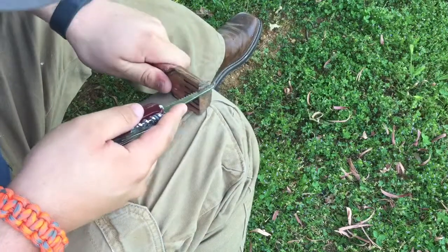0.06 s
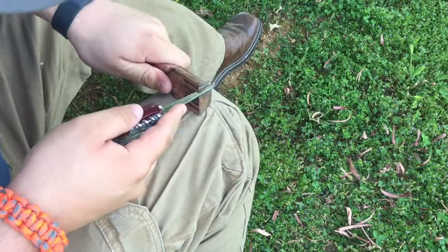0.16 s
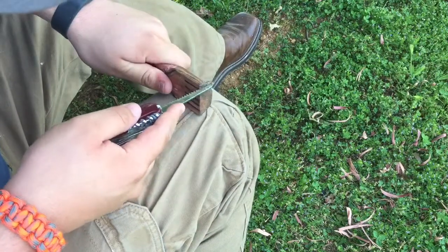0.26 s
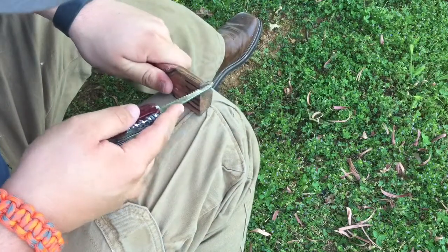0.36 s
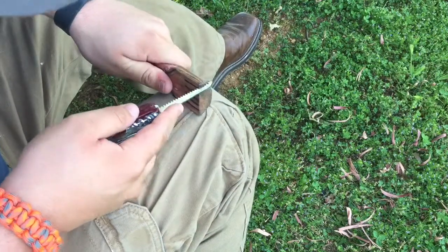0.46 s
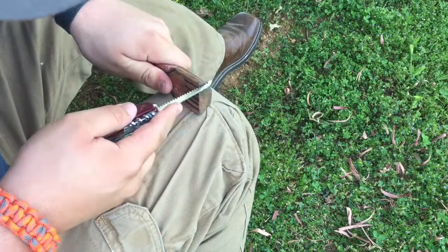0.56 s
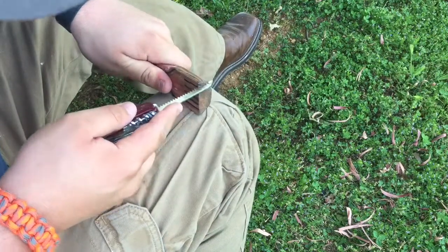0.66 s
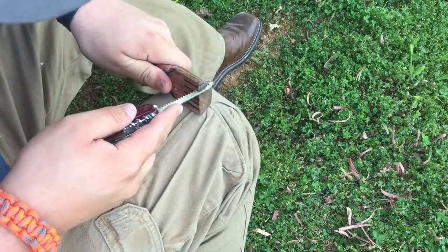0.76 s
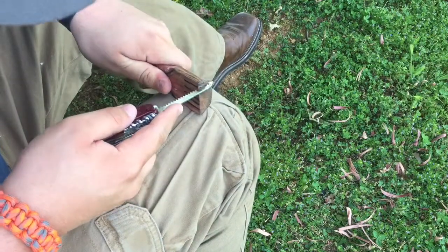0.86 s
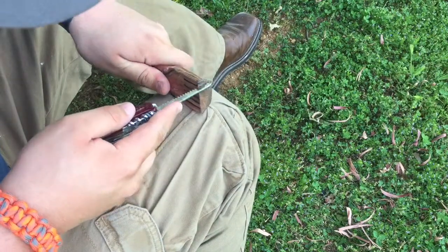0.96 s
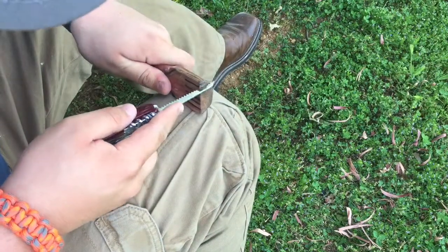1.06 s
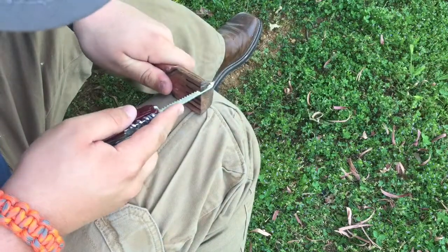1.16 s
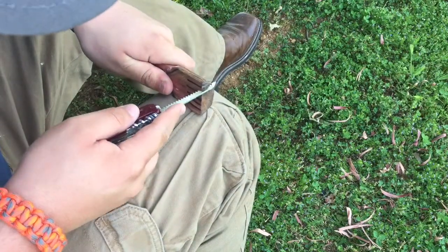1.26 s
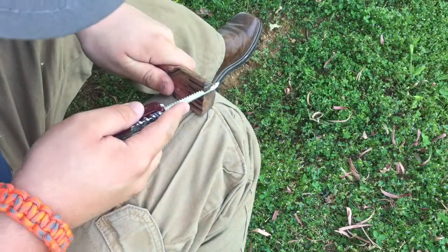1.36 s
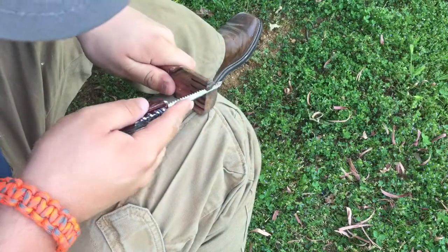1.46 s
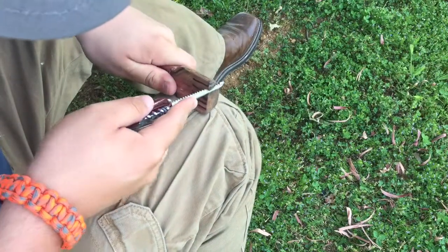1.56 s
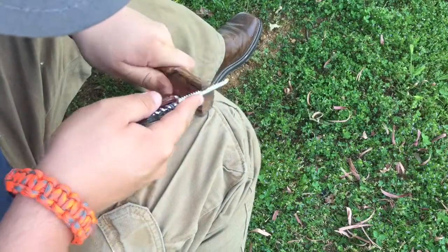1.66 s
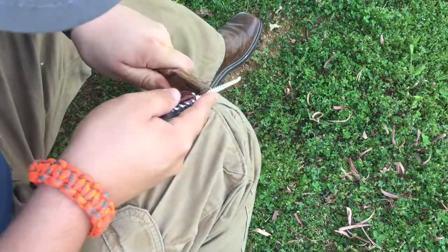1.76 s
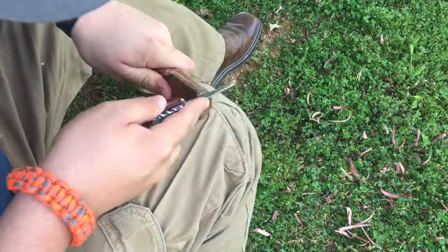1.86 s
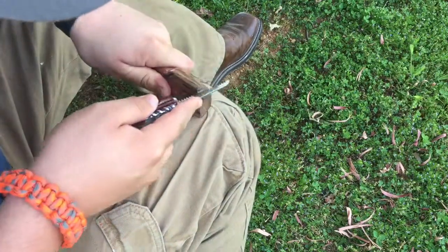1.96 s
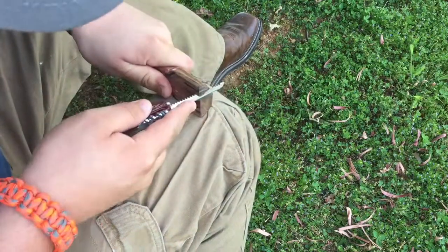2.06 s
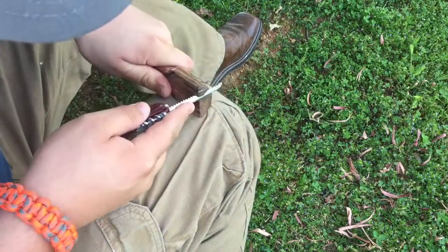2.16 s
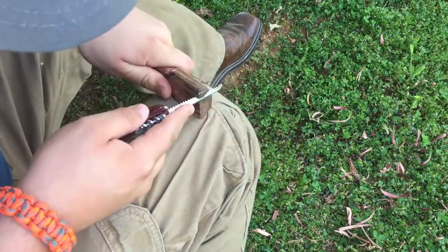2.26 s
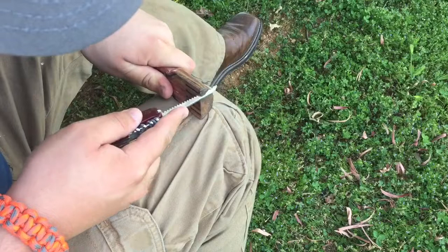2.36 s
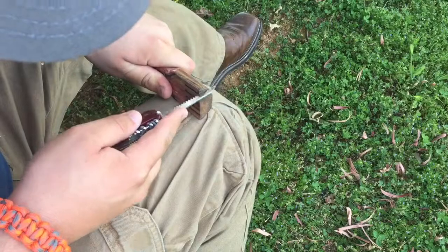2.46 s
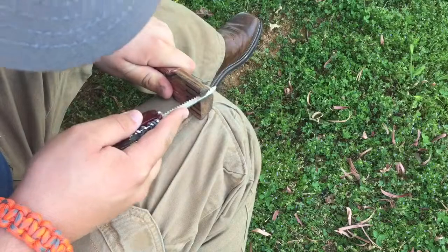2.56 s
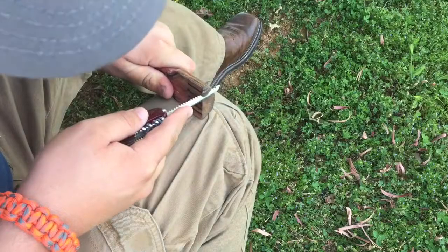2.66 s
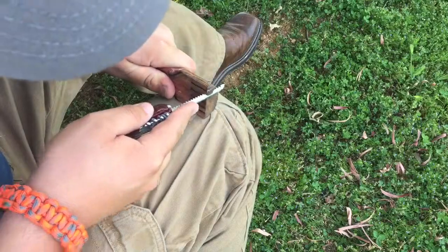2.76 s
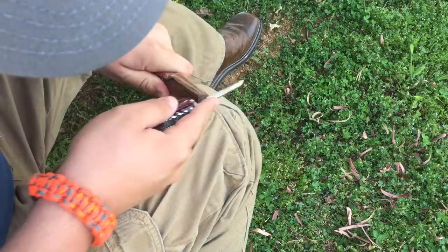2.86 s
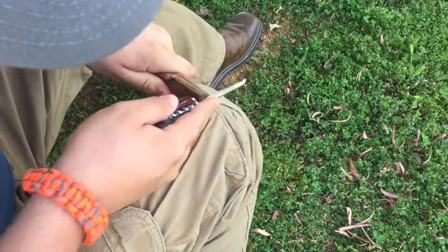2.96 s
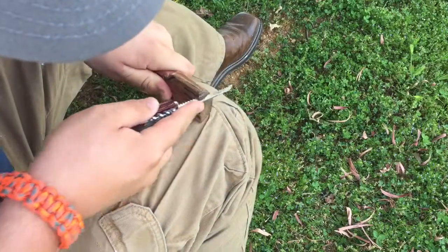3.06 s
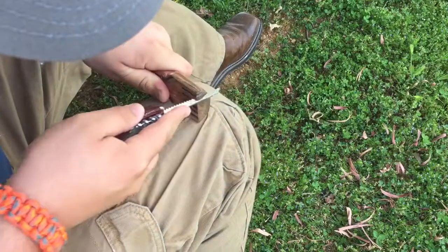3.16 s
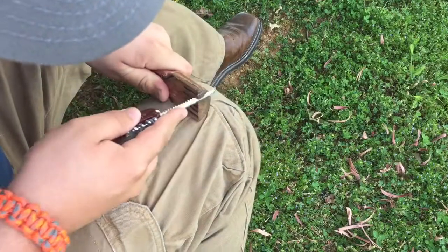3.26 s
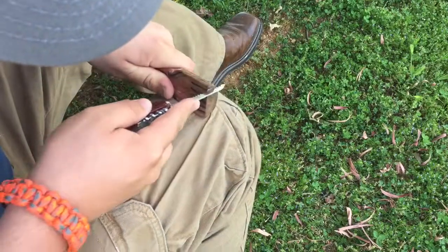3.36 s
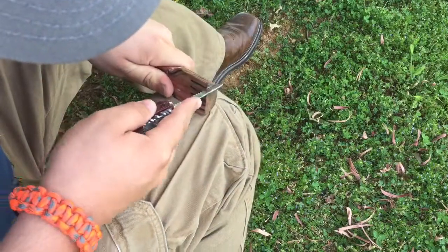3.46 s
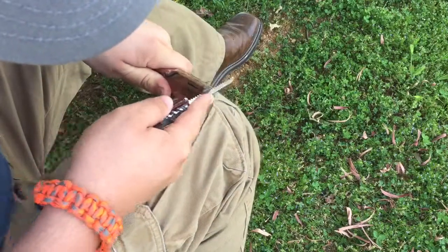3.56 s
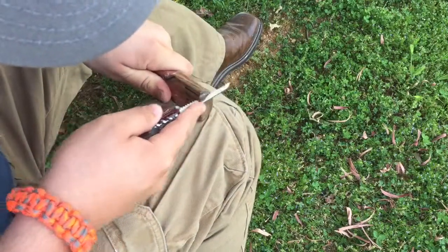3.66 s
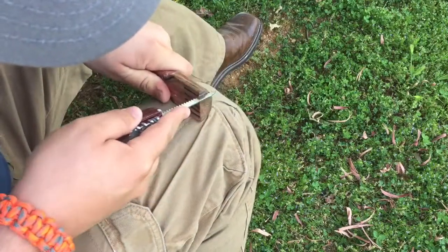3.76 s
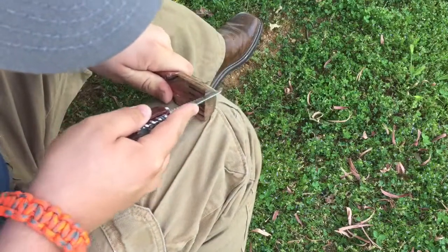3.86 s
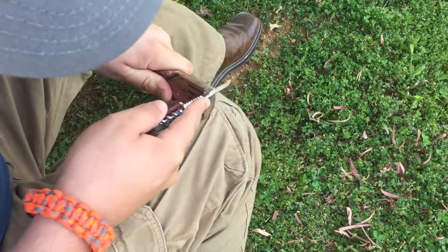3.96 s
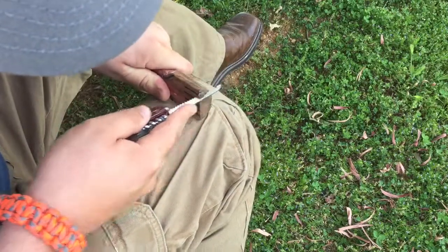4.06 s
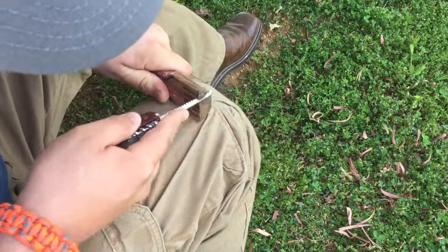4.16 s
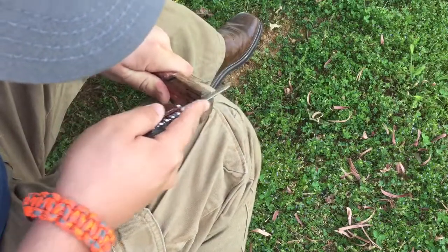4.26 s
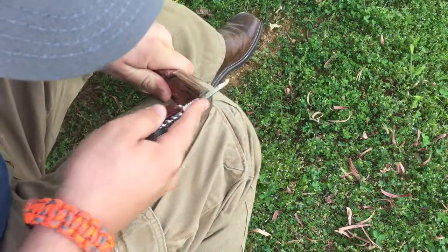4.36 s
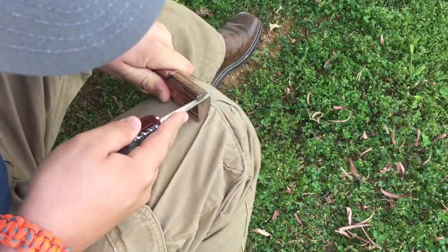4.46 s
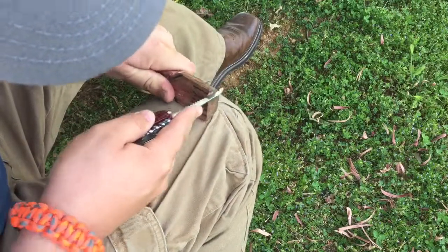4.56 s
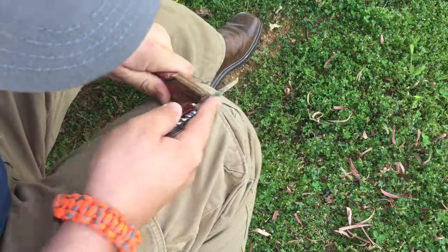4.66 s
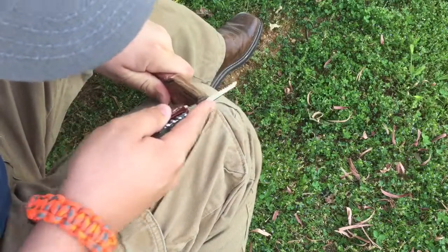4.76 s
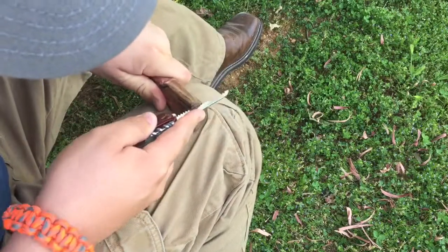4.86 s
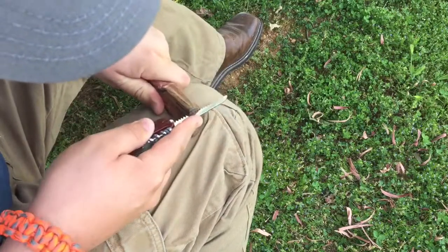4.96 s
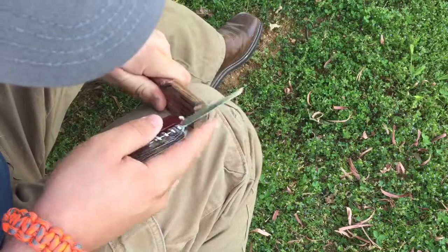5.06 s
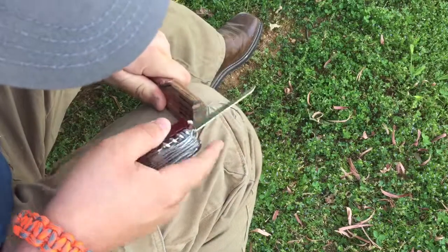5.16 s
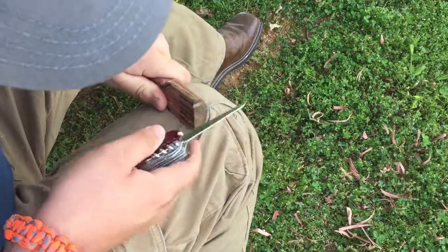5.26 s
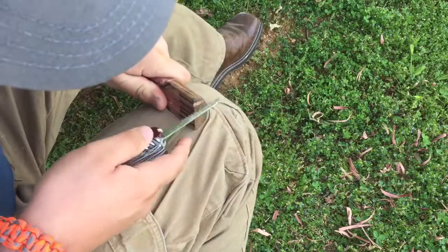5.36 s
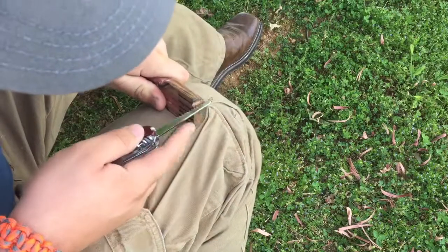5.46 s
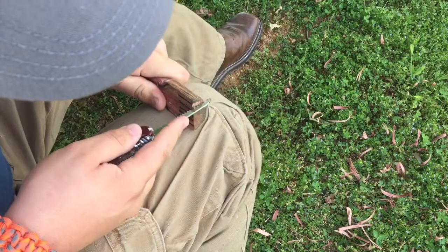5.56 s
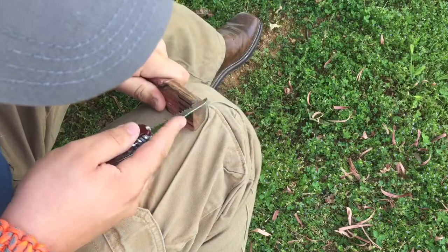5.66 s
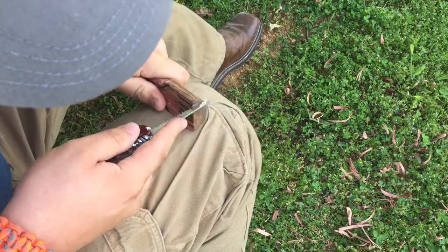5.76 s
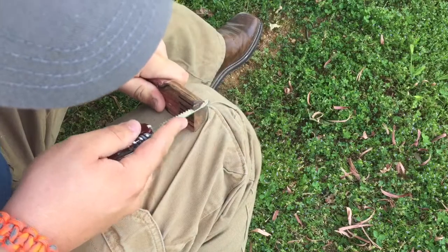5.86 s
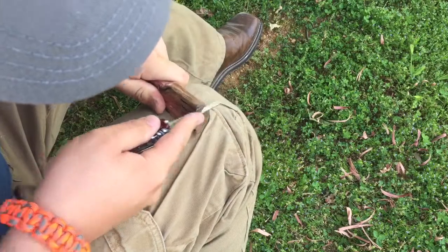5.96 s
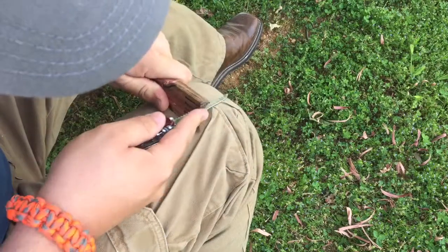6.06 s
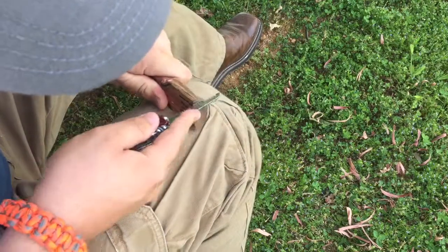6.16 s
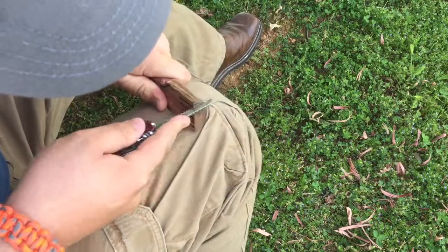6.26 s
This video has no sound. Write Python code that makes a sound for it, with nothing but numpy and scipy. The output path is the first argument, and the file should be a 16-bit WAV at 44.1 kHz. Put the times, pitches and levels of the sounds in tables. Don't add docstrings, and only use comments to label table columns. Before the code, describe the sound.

Small saw teeth grip and slip in a hand-held wood block, giving brief, crackling, knocky scrapes rather than a smooth sawing rhythm. Light taps on the wood come before and between the strokes. The sound is near and dry with only a slight outdoor echo. Behind are soft traffic, a faint hum, even airy hiss, a distant engine rising briefly early on, and faint birds. Sawing pauses near five seconds, then resumes weakly.

```python
import sys
import numpy as np
from scipy import signal
from scipy.fft import rfft, irfft
from scipy.io import wavfile
from scipy.ndimage import uniform_filter1d

SR = 44100
rng = np.random.default_rng(int(sys.argv[2]) if len(sys.argv) > 2 else 0)


def store_pcm(level_fs):
    pcm = np.round(np.clip(level_fs, -1, 1) * 32767).astype(np.int16)
    wavfile.write(sys.argv[1], SR, np.atleast_2d(pcm).T)


def ratio_of_db(decibels):
    return 10 ** (np.asarray(decibels, float) / 20)


N = 278712

# [t/s, level/dB]
TRAFFIC_SWELL = [(0.0, -69), (0.03, -52.5), (0.42, -58), (0.46, -55), (2.46, -52), (2.52, -49.5),
                 (2.67, -53.5), (5.09, -54.5), (5.76, -69.5), (6.16, -45), (6.27, -67), (6.32, -39.5)]
# [f/Hz, level/dB]
RUMBLE_COLOUR = [(12, -25.5), (20, -20.5), (54, -1.5), (108, -2), (134, -1.5), (166, -6.5), (211, -11.5),
                 (248, -13.5), (325, -28), (500, -28.5), (650, -66.5), (1100, -120)]
# [f/Hz, level/dB]
AIR_COLOUR = [(180, -38), (300, 3.5), (326, -6.5), (367, -1.5), (567, -8), (754, -5), (1150, -7),
              (1230, -6), (1530, -7), (2980, -10), (6780, -15.5), (15200, -22), (16500, -41)]

# [peak t/s, level/dB, fall/ms, depth/dB]
CATCHES = [(1.7174, -18, 9, -7.5), (1.7301, -24.5, 6.2, -1.5), (1.774, -32, 14, 0), (1.7946, -39.5, 6.5, 4),
           (1.8825, -41.5, 7, 0.5), (1.9283, -46, 5.7, 0), (1.9483, -38.5, 6, 4.5), (2.059, -46.5, 14, 1),
           (2.8624, -21.5, 6.7, -0.5), (2.9004, -27, 6.5, -4), (3.078, -31, 8, 1), (3.103, -32, 6, 5),
           (3.235, -41.5, 9, 2.5), (3.5525, -21.5, 11.7, -8.5), (3.7296, -31.5, 11.5, -5.5),
           (3.7596, -29.5, 8, -4), (3.7778, -33, 4.8, -5), (3.9296, -42.5, 5, -2), (3.96, -32, 6.6, -3.5),
           (4.0288, -37, 4.7, 3), (4.1238, -27.5, 6, -0.5), (4.1343, -33, 9, -1.5),
           (4.2944, -19, 13.5, -4.5), (4.4618, -32.5, 5, 0.5), (4.614, -41, 3.9, -6),
           (4.6593, -16, 11.5, -5), (4.7043, -20.5, 7.6, -2), (5.973, -29, 4.5, -12),
           (5.9814, -30, 3.9, -8.5), (5.999, -32, 4, -5.5)]
# [peak t/s, level/dB, depth/dB]
SHORT_SLIPS = [(1.745, -28, -2), (1.768, -28, -0.5), (1.8917, -40, 2), (1.9416, -33.5, 3), (2.0005, -37, 2.5),
               (2.0214, -41.5, 3), (2.8765, -28, 5.5), (2.8934, -26.5, -5), (2.9094, -22, -3), (3.065, -34.5, 0),
               (3.098, -28.5, -4), (3.1129, -28.5, 2.5), (3.1279, -32, 2), (3.1828, -30.5, -1.5),
               (3.2157, -38.5, 5), (3.5908, -36, 7.5), (3.944, -29.5, -0.5), (3.953, -32, -3), (3.968, -29, -6.5),
               (4.1556, -33, 1.5), (4.1715, -33, -3.5), (4.1905, -44.5, -5), (4.2693, -31, -3.5),
               (4.3122, -26.5, -2.5), (4.3312, -25, -1), (4.3361, -24.5, -4), (4.6804, -24, -5.5),
               (4.7153, -27.5, 2.5), (4.7312, -32.5, 8), (4.837, -27, -2.5),
               (0.0588, -60, -1), (2.4185, -53.5, -4), (2.6792, -57, 2), (4.593, -52, -4), (5.0603, -57, 1.5),
           (5.7763, -63, 6), (5.9436, -45, 0.5), (5.9554, -51, -15), (6.1185, -60, -18),
           (6.2414, -49.5, -2), (6.251, -44.5, 4), (6.2697, -40, 3), (6.2832, -41, 0), (6.2935, -41.5, 7),
           (6.3014, -43, 8), (6.3186, -37.5, 3)]
# [start t/s, length/s, level/dB, depth/dB]
CHATTER = [(0.305, .025, -59.5, -3), (1.692, .019, -57.5, -14), (1.759, .006, -29.5, 4),
           (1.967, .022, -59, 3), (2.081, .035, -62, 2.5), (2.194, .017, -63.5, -4),
           (2.353, .078, -58, -0.5), (2.884, .003, -41, -19), (2.915, .024, -33.5, 4.5),
           (3.138, .004, -44.5, 1), (3.191, .021, -38.5, -2), (3.228, .003, -43.5, 0),
           (3.249, .011, -44.5, -1), (3.261, .021, -56, 1), (3.567, .017, -36, 1), (3.747, .006, -34, 2),
           (3.789, .016, -43.5, 3), (4.146, .004, -40, -2), (4.471, .038, -33, -4), (4.752, .008, -66, 9),
           (4.832, .015, -38, -2.5), (6.008, .011, -35, -8), (6.094, .017, -62, -3), (4.454, .003, -41, -3),
           (1.875, .003, -51, 10), (4.116, .002, -45, -11)]
# [t/s, level/dB]
RAKE = [(.3, -1.5), (1.72, -1), (1.94, 3), (2.03, -4.5), (2.4, -3.5), (2.87, -2.5), (2.93, 3), (3.1, -3.5),
        (3.56, -1.5), (3.76, 0), (4.05, -0.4), (4.3, -5.5), (4.48, 1), (4.62, 6.5), (4.68, -1.9),
        (5.98, -3.5), (6.01, 4.5), (6.28, 0)]
# [f/Hz, width/Hz, level/dB]
BLOCK_RINGS = [(230, 210, 0), (370, 220, -7), (541, 61, -7), (671, 130, -3.5), (822.5, 145, 4),
               (902, 130, -30.5)]
# [f/Hz, width/Hz, level/dB]
BLOCK_AND_BLADE_RINGS = [(1434, 71, 8), (1533, 267, 10.5), (2007, 234, 13), (2360, 67, 7),
                         (2700, 130, -11.5), (3240, 580, -11.5), (3660, 840, -13.5)]
# [f/Hz, width/Hz, level/dB]
BLADE_RINGS = [(4830, 130, -18), (5950, 600, -5.5), (6110, 2800, 9.5), (7000, 750, -12), (9340, 1600, -20),
               (11810, 1800, -6), (13600, 1500, -16.5)]

# [t/s, thud level/dB, ring level/dB]
TAPS = [
    (.099, -56, -65),
    (0.901, -55, -54),
    (1.3814, -39, -37),
    (2.709, -46, -52),
    (2.7916, -43, -41.5),
]

# [t/s, f/Hz, level/dB, half length/s]
LOW_BIRD = [
    [(.57, 2325, -73, .04), (.66, 2335, -73, .06), (.745, 2415, -66, .022), (.782, 2418, -57, .02),
     (.85, 2400, -68, .045)],
    [(3.38, 2360, -77, .03), (3.45, 2365, -58, .027), (3.535, 2375, -66, .025), (3.62, 2360, -75, .06)],
]
# [t/s, f/Hz, level/dB, half length/s]
HIGH_BIRD = [
    [(.818, 4905, -67, .015), (.85, 4995, -69, .03), (.89, 5050, -61, .03), (.92, 5055, -65, .025),
     (.97, 5055, -77, .035)],
    [(3.51, 4760, -75, .02), (3.55, 4850, -69, .03), (3.61, 4950, -71, .025), (3.67, 4945, -80, .05)],
]
# [t/s, f/Hz, level/dB, half length/s]
FAR_BIRD = [
    [(.16, 3340, -71, .04), (.22, 3340, -77, .06)],
    [(.19, 4560, -83, .06), (.26, 4575, -81, .06)],
]
# [t/s, length/s, first f/Hz, last f/Hz, level/dB]
CHIRPS = [
    (2.228, .03, 2020, 1800, -77),
    (2.603, .031, 2080, 1750, -76),
    (2.958, .03, 2150, 1800, -70),
    (3.31, .027, 2000, 1700, -74),
    (3.46, .031, 1600, 1890, -76),
    (3.645, .03, 1690, 2100, -74),
    (3.824, .03, 1750, 2150, -73),
    (3.997, .027, 1640, 1880, -72),
]

# [middle t/s, length/s, level/dB]
RUSTLE = [
    (4.891, 0.17, -69),
    (5.029, 0.097, -75),
]
# [t/s, level/dB]
THREADS = [
    (4.885, -68),
    (4.973, -56.5),
]


def level(x, db):
    return x * ratio_of_db(db) / np.sqrt(np.mean(x ** 2))


def curve(s, values):
    return np.interp(np.arange(N) / SR, s, values)


def coloured(spectrum):
    hz, db = np.transpose(spectrum)
    f = np.maximum(np.arange(N // 2 + 1) * SR / N, 1)
    shape_db = np.interp(np.log(f), np.log(hz), db, -90, -90)
    white = rfft(rng.standard_normal(N))
    return level(irfft(white * ratio_of_db(shape_db), N), 0)


def walk(rate):
    k = int(SR / rate)
    steps = rng.standard_normal(N)[np.arange(N) // k]
    return 1.426 * uniform_filter1d(uniform_filter1d(steps, k), k)


def peak(x, hz, width):
    return signal.lfilter(*signal.iirpeak(hz, hz / width, SR), x)


def ring(x, modes, wander_db=0.):
    return sum(peak(x * ratio_of_db(db + wander_db * walk(40)), hz, width) for hz, width, db in modes)


def tone(rows, wobble, flutter_db, rate):
    s, hz, db = np.transpose(rows)
    span = np.interp(np.arange(N) / SR, s[[0, -1]], [1, 1], 0, 0)
    gate = uniform_filter1d(span, size=600)
    pitch = curve(s, hz) * (1 + wobble * walk(rate))
    phase = 2 * np.pi * np.cumsum(pitch) / SR
    return np.sqrt(2) * gate * ratio_of_db(curve(s, db) + flutter_db * walk(rate)) * np.sin(phase)


def traffic():
    s, low_db = np.transpose(TRAFFIC_SWELL)
    lull = (s > 4.95) & (s < 5.95)
    upper_db = -61 + .2 * (low_db - low_db.mean()) - 2 * lull
    rumble = coloured(RUMBLE_COLOUR)
    low = signal.sosfiltfilt(signal.butter(3, 90, fs=SR, output="sos"), rumble)
    low_band = level(low, 0) * ratio_of_db(curve(s, low_db) + 1.5 * walk(9))
    upper_band = level(rumble - low, 1.7) * ratio_of_db(curve(s, upper_db) + 3.0 * walk(10))
    return low_band + upper_band


def hum():
    hz, db = 241, -74
    return tone([(0, hz, db), (7, hz, db)], wobble=0.012, flutter_db=2.5, rate=6.5)


def air():
    return coloured(AIR_COLOUR) * ratio_of_db(-68.5 + .4 * walk(1.5))


def slips():
    rows = [(s, 2.1, fall, db, depth) for s, db, fall, depth in CATCHES]
    rows += [(s, 2.1, 2.6, db, depth) for s, db, depth in SHORT_SLIPS]
    tooth_gap_ms, tooth_rise_ms, tooth_fall_ms, scatter_db = 7, 2.4, 4.8, 2.5
    chances = rng.standard_normal((len(CHATTER), 3, 16))
    for (s, length, db, depth), (gap, size, tilt) in zip(CHATTER, chances):
        at = np.cumsum(tooth_gap_ms * 2 ** (gap / 3)) / 1000
        at -= at[0]
        for after, z, y in zip(at, size, tilt):
            if after <= length:
                rows.append((s + after, tooth_rise_ms, tooth_fall_ms,
                             db + scatter_db * z, depth + scatter_db * y))
    s, rise, fall, db, depth = np.transpose(rows)
    bright = db - 10 - 0.02 * (db + 26) + 0.13 * depth
    bright = bright + np.interp(s, *np.transpose(RAKE))
    return np.transpose([s, rise, fall, db + depth, db, bright])


def bite(rows, peak_db):
    power = np.zeros(N)
    for (s, rise, fall, *_), db in zip(rows, peak_db):
        i = np.arange(max(int((s - .05) * SR), 0), min(int((s + .07) * SR), N))
        ms = (i / SR - s) * 1000
        side_ms = np.where(ms < 0, max(rise, .5), max(fall, .5))
        power[i] += ratio_of_db(db - 10 * (ms / side_ms) ** 2) ** 2
    return np.sqrt(power)


def fibres(per_s, spread_db, dust_db):
    when, sign, size = rng.random((3, N))
    snaps = (when < per_s / SR) * np.sign(sign - .5) * ratio_of_db(-spread_db * np.log(1 - size))
    tear = level(snaps, 0) + level(rng.standard_normal(N), dust_db)
    return tear / np.sqrt(uniform_filter1d(tear ** 2, size=130))


def saw():
    tear = fibres(per_s=3000, spread_db=2.5, dust_db=-5)
    out, rows = 0, slips()
    groups = [BLOCK_RINGS, BLOCK_AND_BLADE_RINGS, BLADE_RINGS]
    edges_hz = [[200, 1500], [1000, 4300], [4000, 14500]]
    for modes, db, edges in zip(groups, rows.T[3:], edges_hz):
        band = signal.butter(2, edges, "bandpass", fs=SR, output="sos")
        steady = signal.sosfilt(band, ring(tear, modes)).std()
        driven = ring(tear * bite(rows, db), modes, wander_db=1.7)
        out = out + signal.sosfilt(band, driven) / steady
    for hz, width in [(1100, 360), (3170, 210), (4950, 420)]:
        out = out - 0.75 * peak(out, hz, width)
    return out


def taps():
    out, t = np.zeros(N), np.arange(800) / SR
    for s, thud_db, ring_db in TAPS:
        thud = ratio_of_db(thud_db) * np.exp(-((t - .0025) / 0.0016) ** 2) * np.sin(2 * np.pi * 440 * t)
        fade = np.minimum(t / .0012, 1) * np.exp(-t / .0022)
        wood = ratio_of_db(ring_db) * fade * np.sin(2 * np.pi * 1350 * t)
        tick = ratio_of_db(ring_db - 10.5) * np.exp(-t / .0015) * rng.standard_normal(len(t))
        i = int(s * SR) - 40
        out[i:i + len(t)] += thud + wood + uniform_filter1d(tick, size=4)
    return out


def echo(x):
    t = np.arange(SR // 2) / SR
    fade = ratio_of_db(-60 * t / .25) + 2.5 * ratio_of_db(-60 * t / 0.065)
    tail = rng.standard_normal(len(t)) * fade * np.minimum(t / .003, 1)
    tail = signal.lfilter(*signal.butter(1, [1500, 12000], "bandpass", fs=SR), tail)
    return signal.fftconvolve(x, tail * ratio_of_db(-27) / np.sqrt(np.sum(tail ** 2)))[:N]


def whistle(notes):
    s, hz, db, half = np.transpose(notes)
    t = np.linspace(s[0] - 2 * half[0], s[-1] + 2 * half[-1], 200)
    swell = np.sum(ratio_of_db(db - 10 * ((t[:, None] - s) / half) ** 2) ** 2, axis=1)
    return np.transpose([t, np.interp(t, s, hz), 10 * np.log10(swell)])


def birds():
    out = np.zeros(N)
    for call in LOW_BIRD + HIGH_BIRD:
        clear = tone(whistle(call), wobble=.003, flutter_db=3.0, rate=70)
        out += clear * (1 + .3 * walk(350))
    for call in FAR_BIRD:
        out += tone(whistle(call), wobble=.004, flutter_db=1.0, rate=60) * walk(500)
    for s, length, first_hz, last_hz, db in CHIRPS:
        glide = [(s, first_hz, db), (s + length, last_hz, db)]
        out += tone(glide, wobble=0.0105, flutter_db=7.5, rate=160)
    return out


def engine():
    s = np.array([.34 - .06, .34, .8, .8 + .1])
    hz = 156 + 56 * (s - .34)
    db = -55 - 14 * np.array([1, 0, 0, 1])
    return tone(np.transpose([s, hz, db]), wobble=.006, flutter_db=3.0, rate=14)


def rustle():
    t = np.arange(N) / SR
    swish = sum(ratio_of_db(db - 10 * (2 * (t - s) / length) ** 2) for s, length, db in RUSTLE)
    ticks = sum(ratio_of_db(db - 10 * ((t - s) / 0.0011) ** 2) for s, db in THREADS)
    hiss = ring(rng.standard_normal(N), [(7220, 5400, 5), (12400, 2600, -15)])
    return level(hiss, 0) * (swish * ratio_of_db(2.5 * walk(60)) + ticks)


def scene():
    near = saw() + taps()
    near = near + echo(near) + rustle()
    background = birds() + traffic() + hum() + engine() + air()
    return (near + background)[None]


def top_cut(x):
    return signal.sosfilt(signal.butter(12, 16650, fs=SR, output="sos"), x)


def record(dry):
    dry = signal.sosfilt(signal.butter(2, 36, "high", fs=SR, output="sos"), dry)
    dry = dry - 0.33 * peak(dry, 10500, 1200)
    rounded = np.tanh(dry / .7) * .7
    mix = signal.sosfilt(signal.ellip(6, .2, 50, 15900, fs=SR, output="sos"), rounded)
    return top_cut(mix)


dry = scene()
out = record(dry)
store_pcm(out)
```